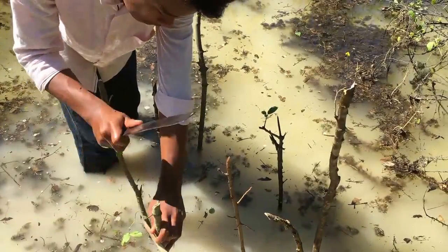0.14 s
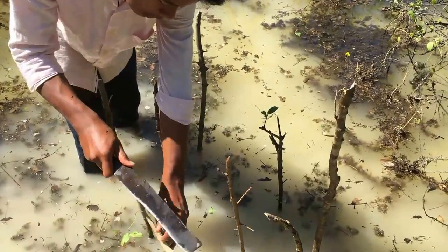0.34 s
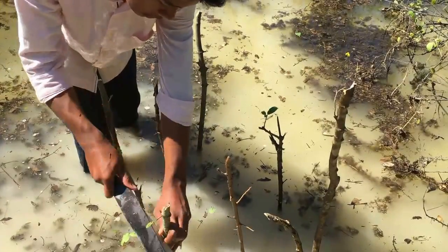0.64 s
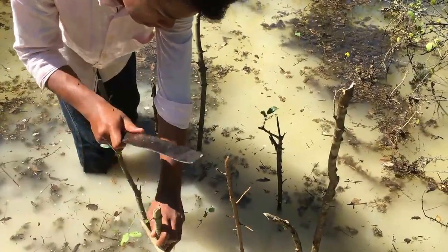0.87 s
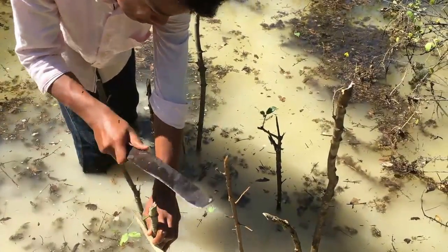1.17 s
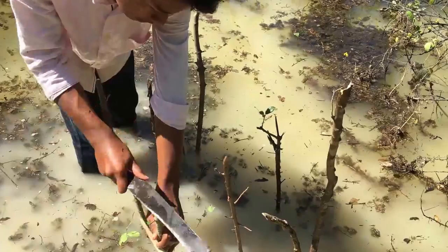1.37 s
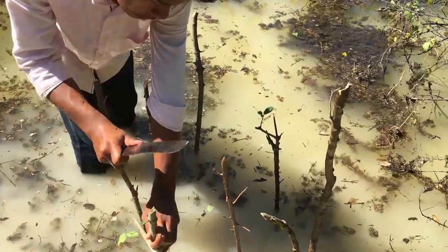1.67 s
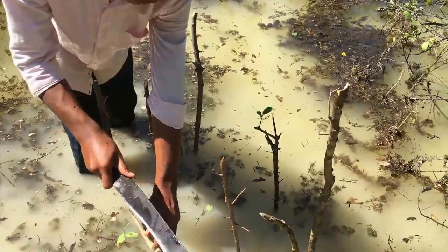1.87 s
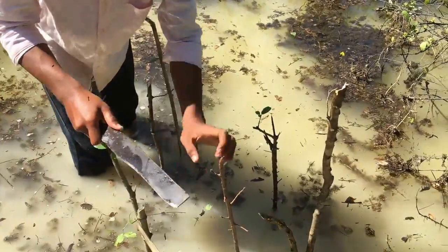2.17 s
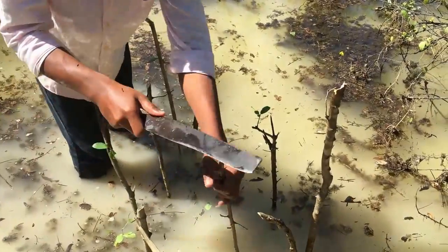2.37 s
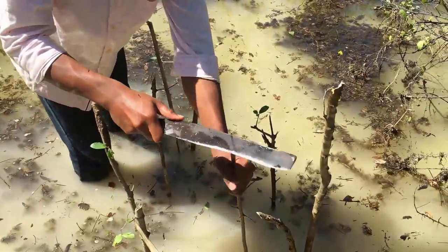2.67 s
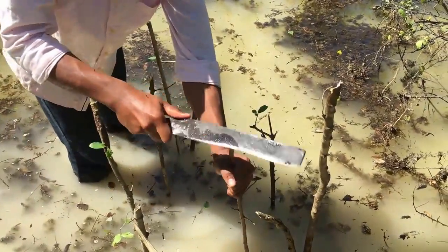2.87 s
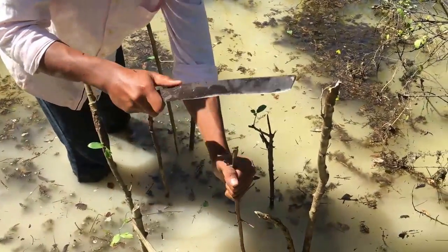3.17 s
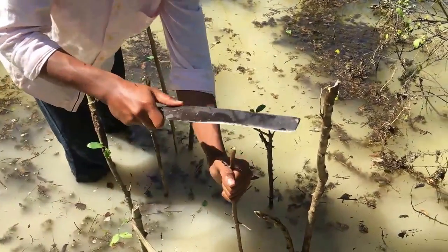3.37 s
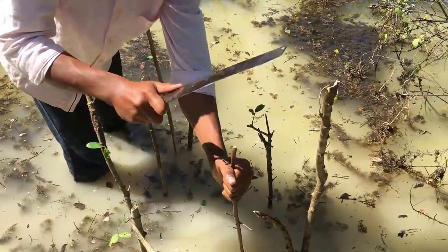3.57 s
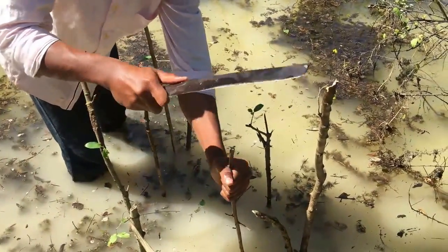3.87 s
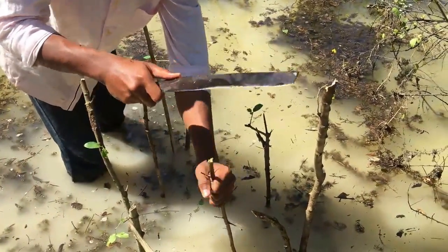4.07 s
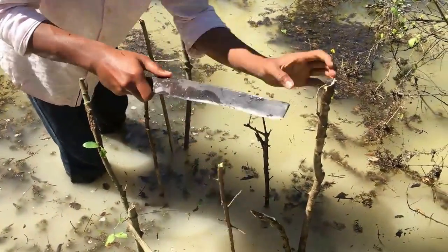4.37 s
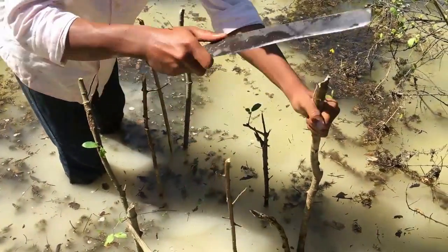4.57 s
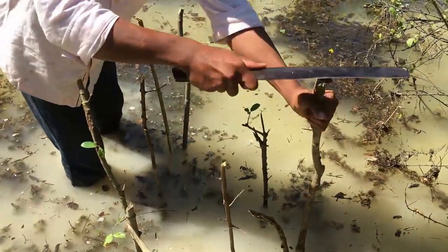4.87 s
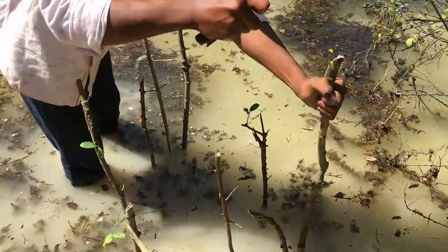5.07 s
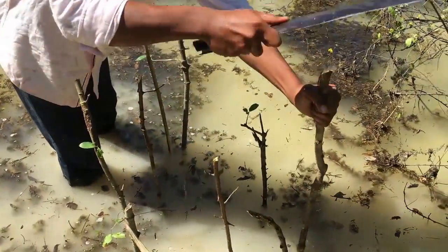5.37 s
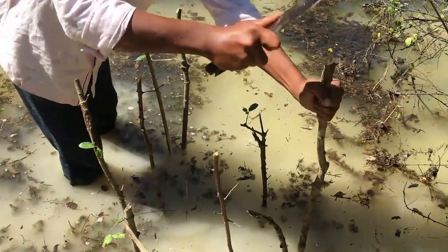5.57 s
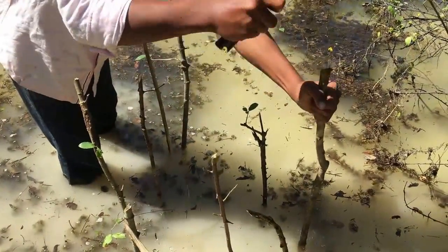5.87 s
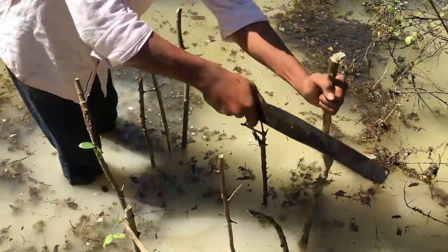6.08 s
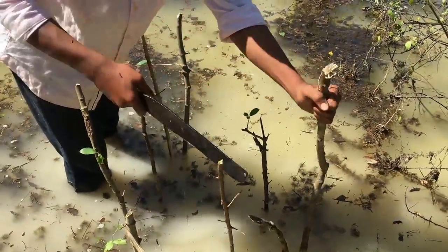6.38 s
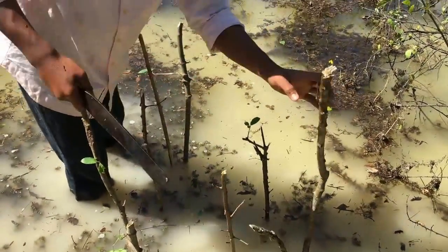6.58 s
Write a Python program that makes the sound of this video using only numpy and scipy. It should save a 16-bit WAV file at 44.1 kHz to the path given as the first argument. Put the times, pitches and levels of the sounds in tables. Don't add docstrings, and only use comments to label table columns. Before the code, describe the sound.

Six hard machete blows crack into a wooden stick close by, then lighter scattered trimming cuts snap twigs over distant engine rumble.

```python
import sys
import numpy as np
from scipy import signal
from scipy.fft import rfft, irfft, next_fast_len
from scipy.io import wavfile
from scipy.ndimage import uniform_filter1d

SR = 44100
rng = np.random.default_rng(int(sys.argv[2]) if len(sys.argv) > 2 else 0)


def gain_from_db(level_db):
    decades = np.asarray(level_db, float) / 20
    return 10 ** decades


def to_wav(sig):
    pcm = np.clip(np.atleast_2d(sig), -1, 1) * 32767
    pcm = np.round(pcm).astype(np.int16)
    wavfile.write(sys.argv[1], SR, pcm.T)


N = 296793
T = np.arange(N) / SR

# (time [s], crack [dB], ring over crack [dB], spot along blade [0-1], brightness [-1..1])
BLOWS = [
    (0.051, 2, 2, 0.3, 0.4),
    (0.422, 1, -1.5, 0.05, 0.05),
    (0.8, 4, -0.5, 0.7, .4),
    (1.215, -1, 1, .7, -.9),
    (1.58, 2, 0, .95, 0.24),
    (1.947, 1, 0, 0.8, -.3),
]
CUTS = [
    (3.097, -24, -15, .8, -0.35),
    (3.87, -23.5, -2.5, 0.94, -0.847),
    (5.027, -19, -8.5, 0.69, 1),
    (5.43, -17, -1.5, 0.55, 0.53),
    (5.816, -8, -10.5, 0.093, 0.049),
    (6.223, -12, -1.5, 0.056, 0.16),
]
# (frequency [Hz], t60 [s])
SPOT_MODES = [(1301.4, .14), (1478, .16), (1615, 0.07), (1678, 0.1), (1686, .25), (1942, 0.06), (2725, .16)]
# (struck near the hand [dB], struck near the tip [dB])
BLOW_SPOT = [(-27.5, -29), (-33, -18), (-28, -20.5), (-18.5, -22.5), (-37.5, -60), (-10, -19.5),
             (-42.5, -54)]
CUT_SPOT = [(-53, -10.5), (-35, -13.5), (-18, -23), (-11.5, -23), (-63, -68), (-15, -22), (-46, -29)]
# (frequency [Hz], level over crack [dB], t60 [s])
BLOW_MODES = [(291, -17.5, .04), (356, -30, 0.12), (546, -32, 0.052), (749, -39, 0.16), (916, -5, 0.025),
              (1006.2, -26, 0.054), (1132, -18.5, .03), (2076, -30.5, 0.073), (2203, -20, 0.044),
              (2653, -22.5, 0.042), (3260, -34, 0.11), (3660, -35, 0.092), (3940, -40, .12),
              (4100, -32.5, 0.06), (4554, -38, 0.062), (5210, -32.5, 0.046), (5700, -43.5, 0.07),
              (6255, -42.5, .07), (7530, -48.5, 0.089)]
CUT_MODES = [(243, -30, 0.084), (527, -23, 0.031), (777, -40, 0.21), (1160, -1.5, 0.0064),
             (3330, -47, 0.08), (4000, -20, 0.027)]
# (lowest spot mode [dB], main one [dB], middle three [dB], upper two [dB],
# thud of the stick [dB])
BLOW_HOLDS = [(.1, -3, .1, 0.017, -0.46), (.1, -0.76, .1, .1, -0.26), (.1, 1.5, .1, .1, -3.5),
              (.1, -0.5, -1.5, 0.65, 2.5), (-.1, 0.5, -1.5, -1.5, 3), (.1, 1.5, .1, -0.69, 2)]
CUT_HOLDS = [(.1, .1, 0.075, .1, .1), (1.5, .1, .1, .1, .1), (.1, .1, 1.5, 1.5, .1), (.1, 3.7, .1, .1, .1),
             (.1, .1, 1.5, .1, .1), (.1, .1, .1, .1, .1)]
HOLD_OF_MODE = [0, 1, 2, 2, 2, 3, 3]
# (frequency [Hz], level per Hz [dB])
BLOW_CRACK = [(120, -47.5), (200, 3.5), (503, -31), (1200, -8.5), (2010, 4), (2600, -10.5), (4790, -8.5),
              (7060, -25), (14500, -37.5), (16500, -53.5)]
CUT_CRACK = [(180, 21.5), (300, -8), (793, -8.5), (1740, 0), (2610, -11.5), (3300, 1.5), (5640, -4.5),
             (10700, -13), (15400, -6), (16500, -38)]
TONE_HZ = [300, 850, 1700, 3500, 11000]
BRIGHT_DB = [-3, 1, -1, 5, 11]
# (frequency [Hz], level under crack [dB], t60 [s])
AFTER = [(300, -22, .12), (1000, -23, .14), (2000, -26.5, 0.3), (2778, -16, 0.035), (4000, -18, 0.12),
         (6000, -19.5, 0.15), (10000, -22, 0.8), (16000, -22.5, .1)]
# (time [s], level [dB])
EDGE = [
    (.052, -54),
    (.424, -56),
    (1.218, -62),
    (5.028, -47),
    (5.43, -60),
    (6.224, -46),
]
# (time [s], peak [dB], pitch [Hz])
TOUCHES = [
    (.029, -43, 2000),
    (.400, -41, 2000),
    (.778, -41, 2000),
    (1.179, -44, 1700),
    (1.555, -53, 1750),
]
# (time [s], peak [dB], pitch [Hz])
KNOCKS = [
    (1.612, -15, 935),
    (2.012, -17.5, 1640),
    (3.112, -15.5, 1760),
    (3.1515, -31, 1410),
    (5.47, -26.5, 1100),
    (3.936, -26.5, 1000),
    (6.134, -42.5, 2080),
    (6.374, -49.5, 1095),
]
SNAPS = [(6.224, -18, 3080), (1.1795, -41, 5380), (2.2498, -41, 4340), (2.761, -53, 3080),
         (2.7902, -51, 4540), (2.8188, -59, 3080), (3.1106, -33, 4480), (3.116, -27.5, 4310),
         (3.9156, -32, 3400), (3.9429, -31.5, 4400), (3.9806, -45, 4370), (5.0304, -24, 5600),
         (5.0587, -46.5, 6400), (5.0936, -45.5, 4250), (5.1333, -46.5, 3430), (5.4456, -38, 4230),
         (5.451, -36, 4100), (5.491, -42, 3800), (5.8605, -30, 3700), (5.893, -42, 5200),
         (5.9044, -40, 4500), (5.9364, -42, 3300), (6.1694, -48, 4370)]
TICKS = [(1.188, -55, 6500), (3.179, -58, 9180), (3.3323, -59, 14200), (3.4481, -58, 10900),
         (3.5498, -51, 14750), (3.8878, -33.5, 9090), (3.8914, -35, 7240), (3.9375, -64, 8940),
         (3.9484, -46, 8870), (3.9644, -57, 6850), (4.0711, -52.5, 8400), (4.4559, -55, 8680),
         (4.6957, -59, 7380), (4.7287, -59, 8650), (4.9135, -56, 6900), (5.4504, -36, 7200),
         (5.4611, -37, 7450), (5.472, -40.5, 12500), (5.4954, -48, 7290), (5.667, -50.5, 8900),
         (5.8395, -33, 8970), (5.8665, -20.5, 8590), (5.9527, -50, 13200), (6.0142, -63, 8550),
         (6.0629, -59, 12270), (6.149, -51, 8580), (6.4423, -58, 12700)]
CLICKS = [(3.8705, -34, 1800), (3.8815, -42, 5000), (3.9155, -39, 4000), (3.9337, -31, 4500),
          (3.9432, -48, 4500), (5.432, -29, 3800), (5.471, -44, 5000), (5.503, -33, 5450),
          (5.8147, -26, 3500), (5.8178, -17, 4480), (5.8637, -25, 2500), (5.8662, -32, 6000),
          (1.1893, -41, 4000), (5.1335, -50, 6000), (5.136, -47, 5000), (3.888, -44, 3500),
          (3.949, -46, 3000), (3.955, -48, 2500), (3.973, -46, 3500)]
# (time [s], length [s], crackle [dB], fall [dB], thickness [dB])
TEARS = [
    (1.178, 0.031, -52.5, 2.5, -3.5),
    (3.1, 0.095, -47.5, 29, -0.5),
    (3.875, 0.044, -43.5, 17, 8),
    (3.935, 0.061, -40, 36, 1),
    (5.035, 0.1, -54.5, 25, 7),
    (5.435, 0.084, -50, 10, -16),
    (5.82, 0.11, -40.5, 19.5, 1),
    (6.23, 0.055, -41, 29, -6),
]
RUSTLES = [
    (2.75, 0.12, -68.5, 15, -18),
    (4.24, 0.14, -70, 8.9, -20),
    (4.68, 0.084, -70.5, 7.3, -14),
    (6.55, 0.12, -72.5, 3.3, -23),
]
# (time [s], level [dB], start frequency [Hz], rise [octaves], length [s])
PLOPS = [(3.098, -44.5, 2780, -0.03, 0.012), (3.106, -48, 1310, 0.1, 0.013), (3.097, -43, 4700, 0.1, .005),
         (3.122, -51, 2620, .3, .012), (3.142, -56, 3100, .01, .006), (3.157, -52.5, 1550, .1, 0.014),
         (3.173, -52, 1950, .15, .011), (3.87, -48, 2700, 0.1, .01), (3.899, -41.5, 2920, -0.4, 0.0075),
         (3.912, -39, 2050, -0.24, .008), (3.918, -32.5, 1820, -0.19, 0.016),
         (3.933, -51, 1810, 0.55, 0.019), (3.9715, -49, 4230, -0.07, .005),
         (5.457, -32, 4630, -0.73, 0.0079), (5.5, -47.5, 2300, 0.04, .006),
         (5.838, -32, 4770, -0.9, 0.0075), (5.842, -32, 2420, -0.4, 0.0085),
         (5.841, -34, 1340, -0.6, 0.0072), (5.848, -36, 4340, -0.16, 0.0041),
         (5.854, -39, 3600, -0.2, 0.0031), (5.859, -30.5, 1060, -0.17, .01),
         (5.869, -39, 790, -0.3, 0.0091), (5.878, -47, 905, 0.24, .009), (5.886, -44, 1160, .3, 0.012),
         (5.899, -43, 1500, 0.23, .01), (5.9, -55, 3000, 0.24, 0.018), (6.221, -27, 5740, -0.03, .006),
         (6.209, -57, 3000, .05, 0.011), (5.027, -34, 3650, 0.5, 0.008), (5.031, -44, 1497, .01, 0.019),
         (3.901, -41, 2310, 0.2, .007), (3.942, -49, 2600, -.3, 0.01), (5.861, -37, 1900, -.5, .007),
         (5.864, -40, 4200, -0.44, 0.0056), (6.228, -33, 1957, -0.01, .022)]
# (time [s], frequency [Hz], level [dB])
BIRD = [
    (6.56, 3430, -84),
    (6.58, 3600, -71),
    (6.63, 3963, -68),
    (6.655, 3980, -68),
    (6.7, 3990, -80),
]
# (time [s], level [dB], pitch [Hz])
FAR_CALL = [
    (5.93, -67, 4170),
]
# (time [s], level over mean [dB])
AIR = [(0, -0.5), (.2, -1.5), (1.4, -2.5), (2.44, -0.9), (3.2, 0), (3.84, -0.5), (4.23, -5), (4.85, -2.5),
       (5.14, -4.5), (5.7, -3.5), (6.73, -1.5)]
# (frequency [Hz], level per Hz [dB])
FIELD = [(12, -48.5), (20, -28.5), (54, -4.5), (73, 4), (87, 0), (103, -7.5), (175, -13), (398, -32.5),
         (700, -42.5), (910, -77.5), (1540, -120)]
ROAD = [(600, -17.5), (800, -6.5), (1080, -2), (1500, -3.5), (2000, -7.5), (2700, -16.5), (4000, -18),
        (7000, -25.5), (9500, -24), (10600, -31), (12000, -25.5), (15700, -29), (16200, -50.5)]
# (time [s], rise [dB], half length [s])
GUSTS = [
    (4.23, 8, 0.3),
    (5.95, 11.5, 0.52),
    (6.4, 11, 0.14),
]
# (time [s], level [dB], half length [s])
INSECTS = [
    (3.55, -85, .25),
    (3.95, -86, .15),
    (4.33, -81, .15),
]
# (time [s], level [dB])
CHORUS = [(0, -90), (1.4, -85), (2.4, -92), (3.6, -90), (4.4, -84), (5, -87), (6.0, -85), (6.73, -88)]
# (frequency [Hz], width [Hz])
INSECT_HZ = [(4020, 22), (8400, 700)]
# (from [s], to [s])
HELD = [
    (0, 1.205),
    (1.58, 2.36),
]
# (frequency [Hz], level per Hz [dB])
PREAMP = [(300, -6.5), (1000, 0), (4000, 2.5), (9000, -1.5), (10600, -5), (12000, -4), (15700, -6),
          (16200, -38)]


def interp_log(hz, points_hz, values):
    return np.interp(np.log(hz), np.log(points_hz), values)


def colour(x, points):
    hz, db = np.transpose(points)
    size = next_fast_len(x.shape[-1], real=True)
    f = np.fft.rfftfreq(size, 1 / SR) + 1
    y = irfft(rfft(x, size) * gain_from_db(interp_log(f, hz, db)), size)[:x.shape[-1]]
    return y / np.std(y)


def half_octaves(size, centres_hz):
    octave = np.log2(np.fft.rfftfreq(size, 1 / SR) + 1)
    return np.clip(1 - 2 * abs(octave - np.log2(centres_hz)[:, None]), 0, 1)


def hump(hz, width_hz):
    return [(hz / 2, -40), (hz - width_hz, -12), (hz, 0), (hz + width_hz, -12), (hz * 2, -40)]


def fade(t, t60):
    return np.exp(-np.log(1000) * t / t60)


def add(out, s, x):
    i = int(s * SR)
    out[i:i + len(x)] += x[:N - i]


def smooth_twice(x, size):
    return uniform_filter1d(uniform_filter1d(x, size), size)


def walk(rate):
    k = int(SR / rate)
    return 1.9 * smooth_twice(np.repeat(rng.standard_normal(N // k + 1), k), k)[:N]


def swells(rows):
    return sum(height * np.exp(-((T - s) / half) ** 2) for s, height, half in rows)


def field():
    engines_db, road_level_db = -41, -65
    near_db, gust_db = np.interp(T, *np.transpose(AIR)), swells(GUSTS)
    road_db = 0.11 * near_db - 0.5 * (T / T[-1] - .5)
    engines = colour(rng.standard_normal(N), FIELD)
    road = colour(rng.standard_normal(N), [(400, -51.5)] + ROAD)
    size = next_fast_len(N, real=True)
    whole = rfft(engines + gain_from_db(road_level_db - engines_db) * road, size)
    centres_hz = 20 * 2 ** np.arange(0, 10.5, .5)
    out = np.zeros(N)
    for hz, weights in zip(centres_hz, half_octaves(size, centres_hz)):
        band = irfft(whole * weights, size)[:N]
        swell_db = gust_db if hz < 55 else near_db if hz < 120 else road_db if hz < 3500 else 0
        out += band * gain_from_db(swell_db + 0.27 * walk(10))
    line = swells([(s, gain_from_db(db), half) for s, db, half in INSECTS])
    chorus = gain_from_db(np.interp(T, *np.transpose(CHORUS)))
    for (hz, width_hz), gain in zip(INSECT_HZ, (line, chorus)):
        points = [(hz - 3 * width_hz, -60), (hz, 0), (hz + 3 * width_hz, -60)]
        unsteady = gain_from_db(2.5 * walk(9) + .5 * walk(2) - 2 - engines_db)
        out += colour(rng.standard_normal(N), points) * gain * unsteady
    return gain_from_db(engines_db) * out


def splinters(rows, sharp, trim_db, click_t60, pure, t60, click_db):
    out, t = np.zeros(N), np.arange(SR // 10) / SR
    click_points = [(1500, -34.0), (4000, -2.5), (15500, -4.5), (16800, -30.5)]
    for s, db, hz in rows:
        noise = rng.standard_normal((2, len(t)))
        pluck = np.sin(2 * np.pi * hz * (t - 0.05 * t ** 2 / t60))
        rough = .6 * colour(noise[0], hump(hz, hz / sharp))
        ring = (pure * pluck + rough) * fade(t, t60) * np.clip(t / 0.0012, 0, 1)
        click = gain_from_db(click_db) * colour(noise[1], click_points) * fade(t, click_t60)
        add(out, s - .001, gain_from_db(db + trim_db) * (ring + click * np.clip(t / 0.00041, 0, 1)))
    return out


def strikes(rows, holds, spots, modes, crack, bite_s, crack_t60, spot_db, crack_db, lead_db, early_s, grip, echo):
    out, t = np.zeros(N), np.arange(SR // 2) / SR
    thud_hz, waver_db = 650, 1.6
    hz = 250 * 2 ** np.arange(0, 6.5, .5)
    column_hz = hz[:, None]
    bands = half_octaves(len(t), hz)
    after_hz, after_db, after_t60 = np.transpose(AFTER)
    tail_db = interp_log(hz, after_hz, after_db)[:, None]
    tail_t60 = interp_log(hz, after_hz, after_t60)[:, None]
    bite = bite_s * np.minimum(1, 2200 / column_hz) ** 0.78
    decay = np.minimum(1, fade(t - bite, crack_t60 * (2000 / column_hz) ** 0.083))
    hand_db, tip_db = np.transpose(spots)
    for (s, db, ring_db, place, bright), hold in zip(rows, np.array(holds)):
        spot = ring_db + hand_db + place * (tip_db - hand_db) + hold[HOLD_OF_MODE]
        tone = bright * np.array(BRIGHT_DB)
        thud_db = hold[-1]

        noise = irfft(rfft(colour(rng.standard_normal(len(t)), crack)) * bands, len(t))
        noise *= gain_from_db(interp_log(hz, TONE_HZ, tone) + thud_db * (hz < thud_hz))[:, None]
        fits = uniform_filter1d(rng.standard_normal(len(t)), 40) * np.sqrt(40)
        tearing = gain_from_db(3.2 * fits)
        burst = tearing * decay * (1 + 0.25 * fade(t, 0.033))
        tail = gain_from_db(tail_db) * fade(t, tail_t60 * echo)
        sound = gain_from_db(crack_db) * np.sum(noise * (burst + tail), axis=0)

        spot_rows = [(f, d + spot_db, t60 * grip) for (f, t60), d in zip(SPOT_MODES, spot)]
        table = np.array(modes + spot_rows)
        chance = rng.standard_normal((len(table), 3))
        spread = np.where(table[:, 0] > 3000, 2.5, 1.5) * (np.arange(len(table)) < len(modes))
        f = table[:, :1] * (1 + .001 * chance[:, :1])
        mode_hz = f[:, 0]
        mode_db = table[:, 1] + spread * chance[:, 1] + interp_log(mode_hz, TONE_HZ, tone)
        gain = gain_from_db(mode_db + thud_db * (mode_hz < thud_hz))
        jolt = rng.standard_normal((len(table), len(t)))
        slow, quick = smooth_twice(jolt, 600), smooth_twice(jolt, 200)
        waver = np.where(f > 2400, 2.5 * quick / np.std(quick), slow / np.std(slow))
        waver = gain_from_db(waver_db * waver * np.clip(t / .03, 0, 1))
        phase = 2 * np.pi * f * t + np.minimum(2, f / 900) * chance[:, 2:]
        rings = gain @ (waver * fade(t, table[:, 2:]) * np.sin(phase))
        sound += rings * np.sin(np.clip(t / (0.8 * bite_s), 0, 1) * np.pi / 2) ** 1.7
        add(out, s - early_s, gain_from_db(db) * sound * np.clip(t / 0.00096, 0, 1))
        add(out, s - .005, gain_from_db(db + lead_db) * noise.sum(axis=0)[-SR // 200:])
    return out


def edge_song():
    out, t = np.zeros(N), np.arange(SR // 4) / SR
    ring = fade(t, .15) * np.clip(t / .003, 0, 1) * np.sin(2 * np.pi * 13385 * t)
    for s, db in EDGE:
        add(out, s, gain_from_db(db) * ring)
    return out


def tearing_twigs(rate, scatter_db, trim_db):
    out, stutter = np.zeros(N), walk(120)
    # (spectrum, grain t60 s)
    ranges = [([(350, -16), (600, -4), (1300, 1), (2400, -6.0), (3500, -33.0)], .012),
              ([(1500, -13), (2500, 2.0), (6500, 1.5), (9000, -26.0)], .005),
              ([(6000, -41), (8000, 6.0), (15500, -10.0), (17000, -24)], .003)]
    # (rows, loudest moment 0-1, share of the highest range dB)
    sources = ((TEARS, 0, -9), (RUSTLES, .5, -4))
    for k, (points, t60) in enumerate(ranges):
        grains = (rng.random(N) < rate / SR) * gain_from_db(scatter_db * rng.exponential(size=N))
        size = signal.lfilter([1], [1, -fade(1 / SR, t60)], grains) + 0.39
        crackle = colour(rng.standard_normal(N), points) * size * gain_from_db(2.2 * stutter)
        level = np.zeros(N)
        for rows, peak, air_db in sources:
            for s, length, db, fall_db, thick_db in rows:
                along = (T - s) / length
                inside = (along > 0) * (along < 1)
                sink_db = fall_db * abs(along - peak) / (1 - peak)
                level += inside * gain_from_db(db + (thick_db, 0, air_db)[k] - sink_db)
        out += uniform_filter1d(level, 200) * crackle / np.std(crackle)
    return gain_from_db(trim_db) * out


def plops():
    out = np.zeros(N)
    for s, db, hz, octaves, length in PLOPS:
        along = np.arange(int(length * SR)) / (length * SR)
        rough = gain_from_db(2.5 * uniform_filter1d(rng.standard_normal(SR // 20), 60)[:len(along)] * 8)
        phase = 2 * np.pi * np.cumsum(hz * 2 ** (octaves * along)) / SR
        add(out, s, gain_from_db(db) * rough * np.sin(np.pi * along ** 0.6) * np.sin(phase))
    return out


def bird():
    s, hz, db = np.transpose(BIRD)
    gate = np.clip(np.minimum(T - s[0], s[-1] - T) / 0.0081, 0, 1)
    phase = 2 * np.pi * np.cumsum(np.interp(T, s, hz) * (1 + .009 * walk(200))) / SR
    return gate * gain_from_db(np.interp(T, s, db) + 2 * walk(73)) * np.sin(phase)


def scene():
    blows = strikes(BLOWS, BLOW_HOLDS, BLOW_SPOT, BLOW_MODES, BLOW_CRACK, bite_s=0.006, crack_t60=0.021,
                    spot_db=6.5, crack_db=-14.0, lead_db=-48, early_s=0.00062, grip=0.99, echo=0.94)
    cuts = strikes(CUTS, CUT_HOLDS, CUT_SPOT, CUT_MODES, CUT_CRACK, bite_s=0.0046, crack_t60=0.029,
                   spot_db=4.0, crack_db=-7.5, lead_db=-35.5, early_s=0.0011, grip=0.91, echo=0.51)
    bits = splinters(KNOCKS, 2.4, -15.5, .014, pure=0.31, t60=0.036, click_db=-19.5)
    bits += splinters(SNAPS, 5.4, -8.5, 0.012, pure=0.64, t60=0.029, click_db=-9.0)
    bits += splinters(TICKS, 5, -2.4, 0.0092, pure=0.7, t60=0.013, click_db=-5.0)
    bits += splinters(CLICKS, 2.2, -2.7, 0.0038, pure=.3, t60=0.0039, click_db=-6.0)
    touches = splinters(TOUCHES, 3.9, -2, .03, pure=.2, t60=.05, click_db=-11.0)
    twigs = tearing_twigs(2500, 3.8, -4.0) + touches
    birds = bird() + splinters(FAR_CALL, 30, 0, .011, pure=0.92, t60=0.43, click_db=-37)
    return (blows + cuts + bits + edge_song() + twigs + plops() + birds + field())[None]


def dull_before_strikes(x, rows, above_hz):
    step, first_step, longest = 1024, 715, 900
    ahead_s = .005
    gate = np.zeros(N)
    for s, *_ in rows:
        since = (s * SR - first_step) % step
        inside = np.minimum(T - s + since / SR, s - ahead_s - T)
        gate += (since < longest) * np.clip(inside / .001, 0, 1)
    treble = signal.sosfiltfilt(signal.butter(6, above_hz, "high", fs=SR, output="sos"), x)
    return x - treble * gate


def low_pass(x):
    return signal.sosfilt(signal.butter(12, 16800, fs=SR, output="sos"), x)


def record(dry):
    ceiling = 1.02
    held = sum((T >= a) & (T < b) for a, b in HELD)
    dry = signal.sosfilt(signal.butter(2, 33, "high", fs=SR, output="sos"), dry)
    hiss = gain_from_db(-65.5) * colour(rng.standard_normal(N), PREAMP) * held
    mix = np.tanh(dry / ceiling) * ceiling + hiss
    mix = signal.sosfilt(signal.ellip(6, .2, 60, 16200, fs=SR, output="sos"), mix)
    mix = dull_before_strikes(mix, BLOWS, above_hz=1400)
    mix = dull_before_strikes(mix, CUTS, above_hz=4000)
    return low_pass(mix)


dry = scene()
out = record(dry)
to_wav(out)
```